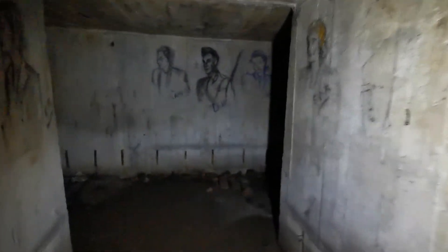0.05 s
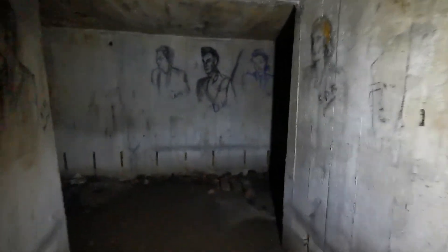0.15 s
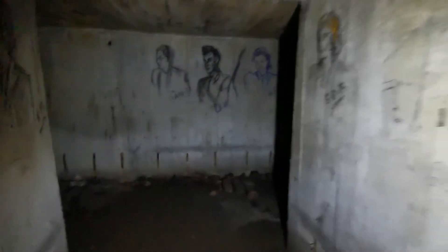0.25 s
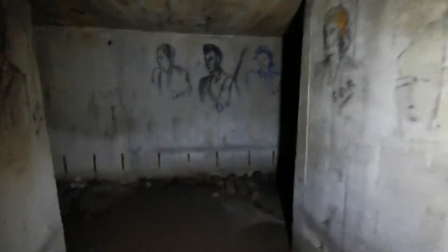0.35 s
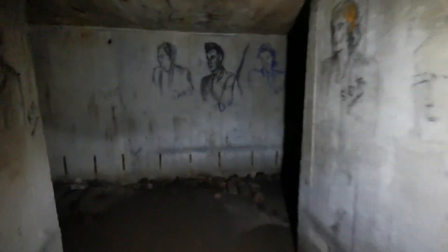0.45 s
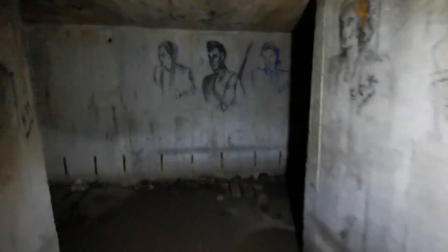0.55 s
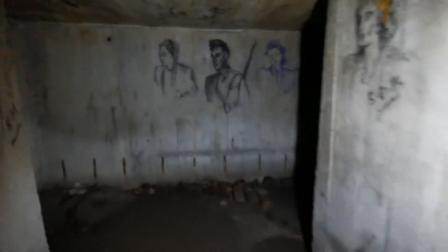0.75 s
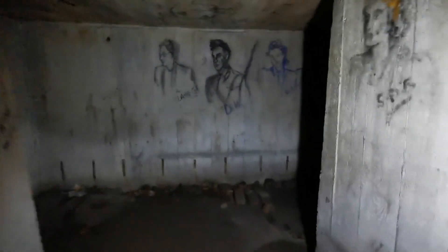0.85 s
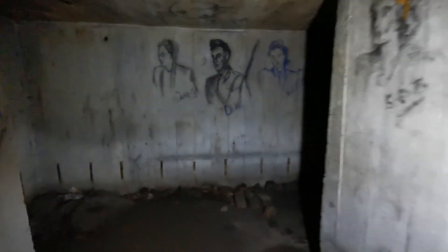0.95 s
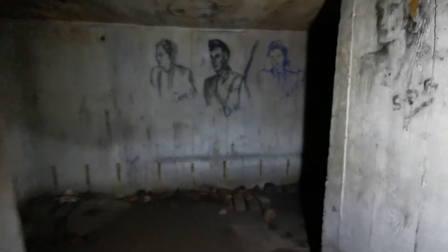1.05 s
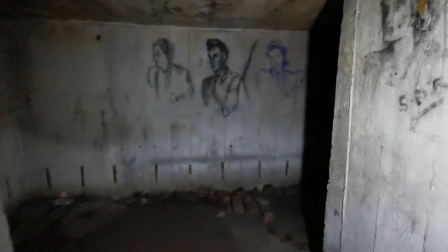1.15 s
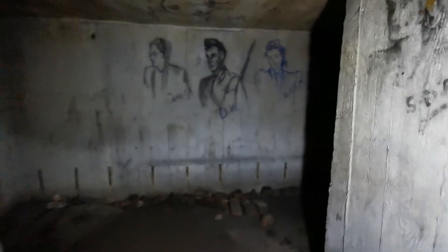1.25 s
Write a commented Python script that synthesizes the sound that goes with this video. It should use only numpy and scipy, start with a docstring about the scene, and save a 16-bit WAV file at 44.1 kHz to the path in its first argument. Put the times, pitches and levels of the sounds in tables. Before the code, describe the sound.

A shoe scuffs and knocks on a gritty floor, echoing in a small concrete shelter.

```python
"""A faint scrape of a sole over a low rumble, near a stereo pair in a small bare concrete shelter.
The shoe knocks down on the gritty floor and rings its hollow heel, a dull thud follows,
then soles scuff, rolling grit and cracking single grains. The walls answer with close echoes,
a dense tail and a few booming room modes, while the boom of earlier steps dies away."""
import sys
import numpy as np
from scipy import signal
from scipy.fft import rfft, irfft, next_fast_len
from scipy.io import wavfile

SR = 44100
rng = np.random.default_rng(int(sys.argv[2]) if len(sys.argv) > 2 else 0)


def to_wav(sig):
    """Store sig (one row per channel, or 1-D mono) as 16-bit WAV at the path in sys.argv[1].

    Samples outside -1..1 are clipped; the rate is SR.
    """
    pcm = np.clip(np.atleast_2d(sig), -1, 1) * 32767
    pcm = np.round(pcm).astype(np.int16)
    wavfile.write(sys.argv[1], SR, pcm.T)  # frames by channels


N = 57330
TIME = np.arange(N) / SR


def from_db(db):
    """Decibels to gain."""
    return 10 ** (np.asarray(db) / 20)


def rms_one(x):
    """Scale to unit rms."""
    return x / np.sqrt(np.mean(x ** 2) + 1e-20)


def decay(t60, age=TIME):
    """An envelope that falls 60 dB in t60 seconds."""
    return np.exp(-np.log(1000) * age / t60)


def at_hz(points, hz):
    """Read a table on a log-frequency axis."""
    f, value = np.transpose(points)
    return np.interp(np.log(np.maximum(hz, 1)), np.log(f), value)


def colour(x, spectrum, size=8192):
    """Causal (minimum-phase) filter with the given dB curve."""
    hz = np.arange(size // 2 + 1) * SR / size
    cepstrum = irfft(np.log(from_db(at_hz(spectrum, hz))))
    cepstrum[1:size // 2] *= 2
    cepstrum[size // 2 + 1:] = 0
    impulse = irfft(np.exp(rfft(cepstrum)))
    padded = next_fast_len(N + size, real=True)
    return irfft(rfft(x, padded) * rfft(impulse, padded), padded)[..., :N]


def cut(x, hz, kind):
    """Second-order high- or low-pass."""
    sos = signal.butter(2, np.clip(hz, 10, .45 * SR), kind, fs=SR, output="sos")
    return signal.sosfilt(sos, x + 1e-18)


def delay(x, s):
    """The same sound, s seconds later."""
    return np.interp(TIME - s, TIME, x, left=0, right=0)


def diffuse_noise():
    """White noise at the two microphones, alike in the bass and unrelated in the treble."""
    # likeness of left and right: f/Hz, correlation
    likeness = [(40, 0.69), (120, .94), (330, 0.95), (700, 0.43), (1300, 0.016), (15000, 0.035)]
    mid, side = rfft(rng.standard_normal((2, N)))
    alike = at_hz(likeness, np.arange(len(mid)) * SR / N)
    return irfft(np.sqrt((1 + alike) / 2) * mid + np.sqrt((1 - alike) / 2) * side * [[1], [-1]], N)


def background():
    """Room tone: a steady low rumble with faint hiss, and the fading boom of earlier steps."""
    # spectra of the boom and the rumble: f/Hz, relative level/dB
    boom_spectrum = [(50, -12), (75, -7), (98, 6), (140, -21), (270, -2.5), (400, -8.5), (700, -22),
                     (2000, -39)]
    rumble_spectrum = [(20, -2), (50, -3.5), (72, -9.5), (98, 1), (135, -13.5), (260, -9), (600, -14.5),
                       (1500, -27), (5000, -26), (11000, -30.5), (15500, -42)]
    boom = from_db(-55) * decay(t60=1.65) * rms_one(colour(diffuse_noise(), boom_spectrum))
    rumble = from_db(-65.5) * rms_one(colour(diffuse_noise(), rumble_spectrum))
    return boom + rumble


def wall_tail():
    """The shelter's reverberation: half-octave bands build up, then die each at its own rate."""
    # starting spectrum of the tail: f/Hz, level/dB
    levels = [(60, -33), (130, -35.5), (200, -28.5), (320, -30.5), (600, -33), (1000, -31), (2500, -28),
              (9000, -26.5)]
    # reverberation time: f/Hz, t60/s
    decay_times = [(100, 1), (300, 1), (700, 0.69), (2000, 0.72), (5000, 0.54), (9000, 0.47), (15000, 0.44)]
    build_s = .0027
    noise = rfft(diffuse_noise())
    hz = np.arange(noise.shape[1]) * SR / N
    out = 0
    for centre in 45 * 2 ** np.arange(0, 9.1, .5):
        half_octaves = np.clip(2 * np.log2(np.maximum(hz, 1) / centre), -1, 1)
        band = irfft(noise * np.cos(np.pi / 2 * half_octaves) ** 2, N)
        out += band * from_db(at_hz(levels, centre)) * decay(at_hz(decay_times, centre))
    return out * (1 - np.exp(-TIME / build_s))


def standing_waves(x):
    """Blows on the floor set the room's modes ringing, the same at both microphones."""
    # room modes: f/Hz, level/dB, t60/s
    modes = [(87, -47, 0.38), (96.7, -52, 1.57), (192, -62.5, .8), (228.4, -50.5, 1.02), (269, -47, 1.74),
             (272.9, -43.5, 0.57), (354.4, -46.5, 1.073), (361, -87, 0.46), (530, -54.5, .8),
             (572.5, -46.5, 0.41), (647, -55, 0.75), (799, -54, 0.4), (921, -59.5, 0.42),
             (1332, -55.5, 0.38)]
    build_s = .018
    rings = sum(from_db(db) * np.cos(2 * np.pi * hz * TIME) * decay(t60) for hz, db, t60 in modes)
    return signal.fftconvolve(x, rings * (1 - np.exp(-TIME / build_s)))[:N]


def near_paths(x):
    """The direct sound reaches the right microphone first; echoes follow from alternate sides."""
    # echoes off the close walls: delay/s, level/dB
    echoes = [(.003, -9.5), (.0108, -15), (.0137, -13.5), (.0238, -23)]
    right_lead_s, echo_skew_s = .0001, .00021
    out = np.array([delay(x, right_lead_s), x])
    for k, (s, db) in enumerate(echoes):
        skew = echo_skew_s / 2 * (-1) ** k
        out += from_db(db) * np.array([delay(x, s + skew), delay(x, s - skew)])
    return out


def grains(spectrum, per_s=5000, spread_db=4):
    """Grit underfoot: dense tiny clicks of uneven size, at unit rms."""
    sizes = from_db(spread_db * np.minimum(rng.exponential(1, N), 4))
    signs = rng.choice([-1, 1], N)
    struck = rng.random(N) < per_s / SR
    return rms_one(colour(sizes * signs * struck, spectrum))


def scuffs():
    """The sole rubs on concrete and rolls grit, swelling and fading with its pressure."""
    # slides: t/s of greatest pressure, rise/s, fall/s, rub level/dB, rub low cut/Hz,
    # grit level/dB, grit high cut/Hz
    slides = [(.002, 0.024, 0.046, -61.5, 614, -54, 6000), (0.191, .012, .04, -62.5, 250, -68, 8100),
              (0.2437, 0.0042, 0.0049, -35.5, 600, -51.5, 13000), (.263, 0.012, .013, -36, 203, -34, 13900),
              (0.481, 0.0044, 0.0038, -43, 880, -50, 14400), (0.589, 0.097, .04, -62.5, 900, -58, 17200),
              (.641, 0.002, 0.0056, -44.5, 910, -51.5, 15900),
              (.675, 0.04, 0.043, -57.5, 1016, -53.5, 10600),
              (0.846, 0.0042, 0.026, -52.5, 1300, -57.5, 16200),
              (1.03, 0.045, 0.038, -71.5, 1206, -70, 15800), (1.295, .015, .03, -85, 900, -72, 10900)]
    # spectra of the dull rub and the bright grit: f/Hz, relative level/dB
    rub_spectrum = [(120, -24), (250, -10), (500, 5), (850, -3.5), (1400, 0), (2400, -1), (3100, -9.5),
                    (6000, -17.5), (15000, -40)]
    grit_spectrum = [(300, -8.5), (1500, -6), (3500, -5), (5000, -2.5), (6800, -2.5), (8000, -1), (9200, 4),
                     (11000, -2), (13000, -5.5), (15500, -11)]
    rub, grit = grains(rub_spectrum), grains(grit_spectrum)
    out = 0
    for s, rise, fall, rub_db, low_hz, grit_db, top_hz in slides:
        pressure = np.exp(-(np.minimum(TIME - s, 0) / rise) ** 2 - np.maximum(TIME - s, 0) / fall)
        dull = from_db(rub_db) * cut(rub, low_hz, "high")
        bright = from_db(grit_db) * cut(grit, top_hz, "low")
        out += pressure * (dull + bright)
    return out


def cracks(fall_s=.0012):
    """Single grains burst under the sole, each in a very short bright tick."""
    # bursting grains: t/s, relative level/dB
    bursts = [(0.053, -45), (0.259, -42), (0.269, -35), (0.6343, -32.5), (0.6373, -34), (0.6693, -28),
              (.845, -35.5), (1.042, -46)]
    # spectrum of a tick: f/Hz, relative level/dB
    tick_spectrum = [(1000, -50), (4000, 0.5), (6500, -9), (9000, -7.5), (11500, 5), (13500, -10),
                     (15500, -20)]
    envelope = sum(from_db(db) * (TIME >= s) * np.exp(-np.abs(TIME - s) / fall_s) for s, db in bursts)
    return envelope * rms_one(colour(rng.standard_normal(N), tick_spectrum)) / 2


def thuds():
    """Each blow of the shoe makes one smooth swing of air pressure and rings the heel."""
    # shoe blows: t/s, swing level/dB before its low cut, swing f/Hz, low cut/Hz, ring level/dB
    blows = [(.2583, -27.5, 780, 457, -35.5), (0.2661, -21, 612, 364, -36.5),
             (0.268, -24, 1030, 474, -53.5), (0.4797, -21, 543, 40.5, -48.5)]
    # modes of the heel's hollow knock: f/Hz, relative level/dB, t60/s
    heel = [(645, -8.5, 0.049), (810, -5, 0.083), (922, -7, 0.1), (1188, -0.5, 0.043), (1370, -19, 0.032),
            (1920, -4, 0.021)]
    out = 0
    for s, swing_db, swing_hz, low_hz, ring_db in blows:
        phase = 2 * np.pi * swing_hz * (TIME - s)
        swing = cut(phase * np.exp((1 - phase ** 2) / 2), low_hz, "high")
        age = np.maximum(TIME - s, 0)
        ring = sum(from_db(db) * np.sin(2 * np.pi * hz * age) * decay(t60, age) for hz, db, t60 in heel)
        out += from_db(swing_db) * swing + from_db(ring_db) * ring
    return out


def scene():
    """The shoes, heard directly and off the shelter's walls, over the room tone."""
    blows, slides, ticks = thuds(), scuffs(), cracks()
    slide_cycle_s, tick_send_db = .02, -7
    # a sliding sole keeps changing its paths to the walls, so it swings between two tails
    turn = 2 * np.pi * TIME / slide_cycle_s
    feeds = [blows + slides * np.cos(turn), from_db(tick_send_db) * ticks + slides * np.sin(turn)]
    tail = sum(signal.fftconvolve(feed[None], wall_tail(), axes=1)[:, :N] for feed in feeds)
    return near_paths(blows + slides + ticks) + tail + standing_waves(blows) + background()


def record(dry):
    """Each microphone of the pair has its own colour; the top is cut steeply."""
    # balance of the pair: f/Hz, left minus right level/dB
    balance = [(40, 5), (170, -0.7), (350, -0.3), (700, -4), (1400, 0), (2800, -2.5), (5500, -1.5),
               (9500, -2.5), (13500, -7.5)]
    cutoff_hz = 15750
    left = colour(dry[0], [(hz, db / 2) for hz, db in balance])
    right = colour(dry[1], [(hz, -db / 2) for hz, db in balance])
    return signal.sosfilt(signal.ellip(12, .2, 80, cutoff_hz, fs=SR, output="sos"), [left, right])


dry = scene()
out = record(dry)
to_wav(out)
```